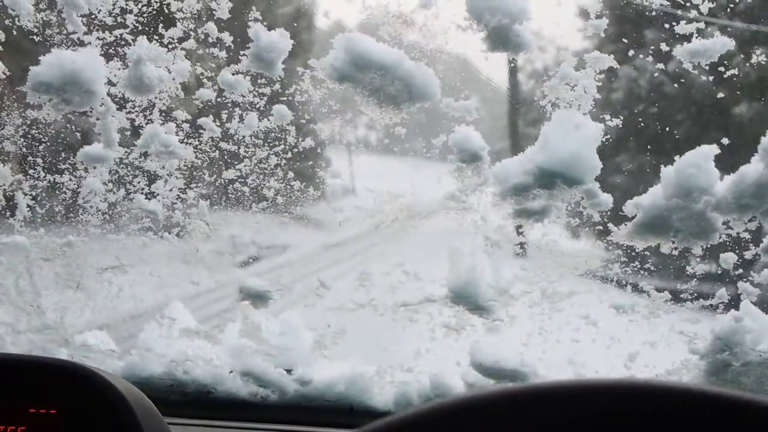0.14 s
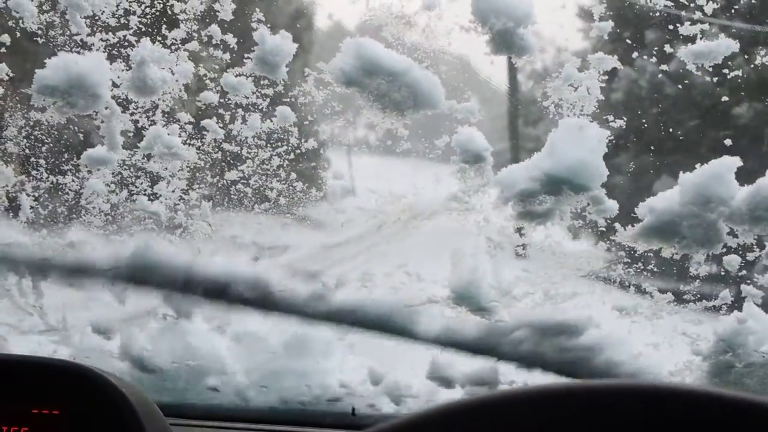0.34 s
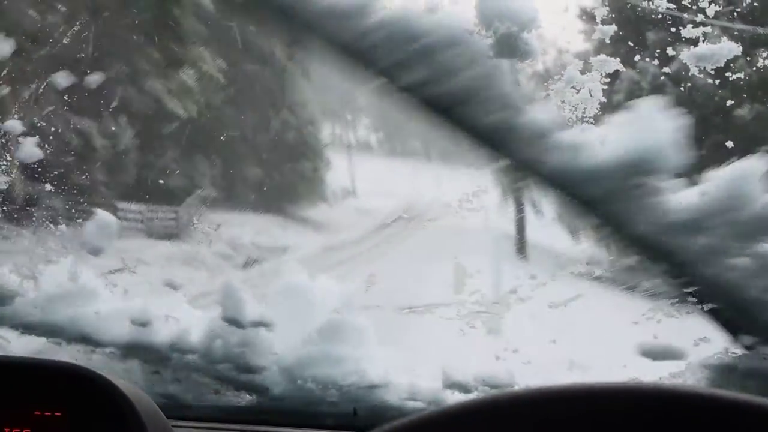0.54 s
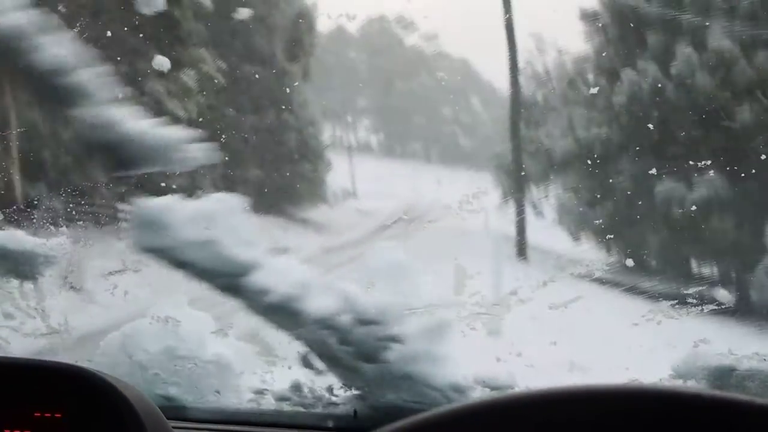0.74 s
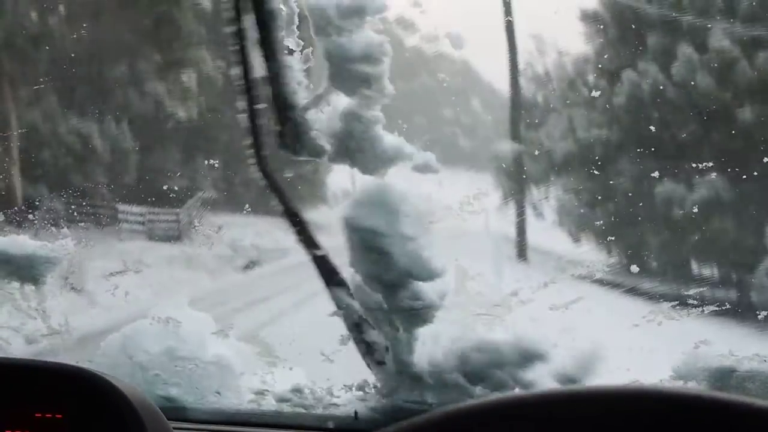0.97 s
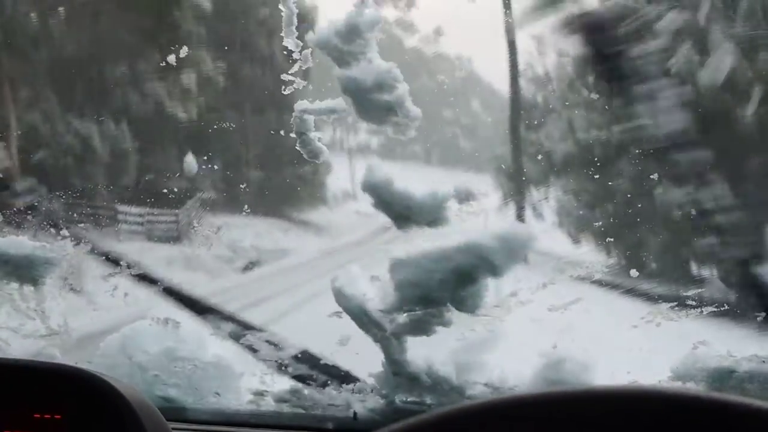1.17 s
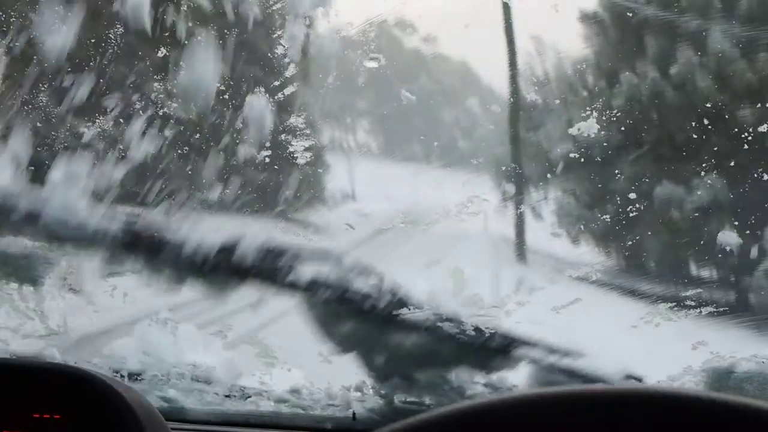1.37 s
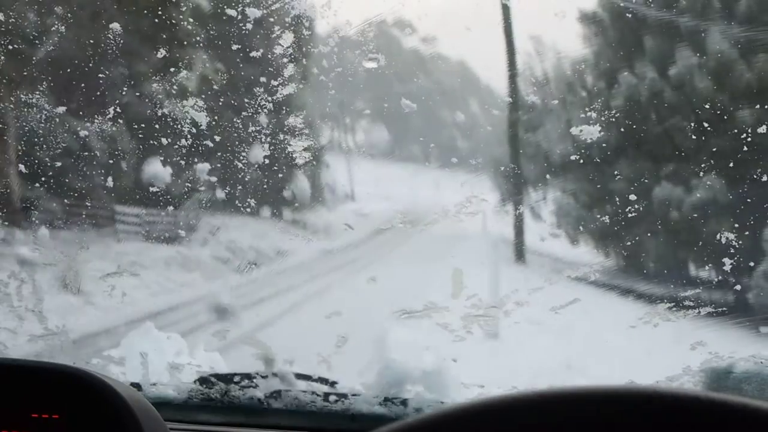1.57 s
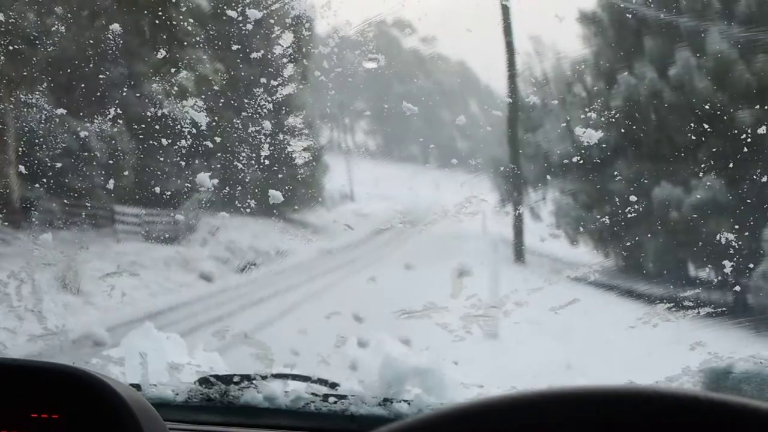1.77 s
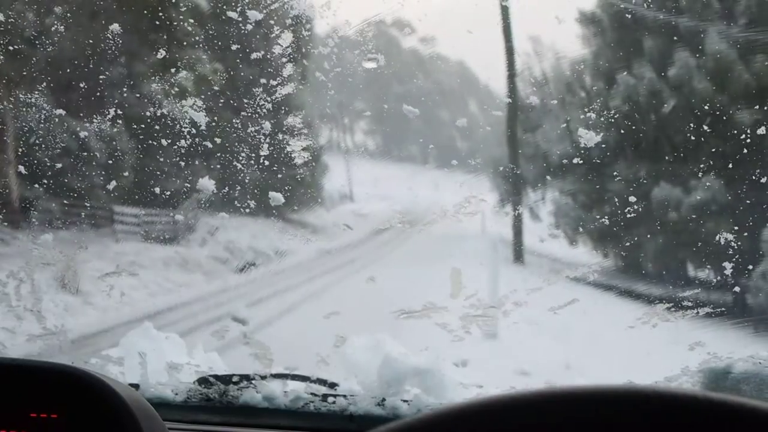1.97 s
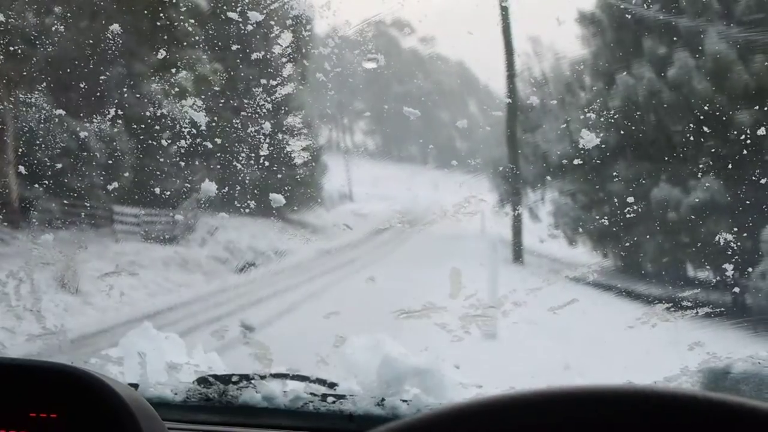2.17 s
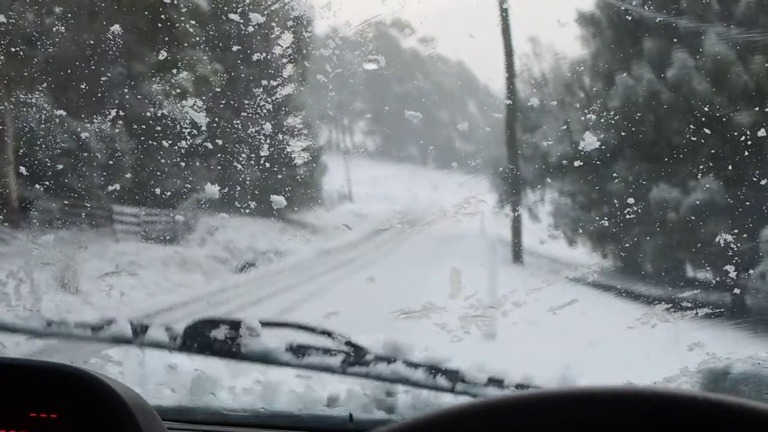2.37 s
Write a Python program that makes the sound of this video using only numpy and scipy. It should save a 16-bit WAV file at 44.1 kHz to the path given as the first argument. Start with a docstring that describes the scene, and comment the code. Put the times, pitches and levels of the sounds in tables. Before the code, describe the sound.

Wipers clear snow, heard close in stereo inside a parked car with a steady, ticking, chirping idle and faint hiss. A relay clicks at 0 s; the motor groans and whirrs, linkage knocks around 0.3 s, and blades crunch through snow, easing by 0.6 s. Low thuds at 1.0 and 1.36 s, scraping back until 1.6 s. Idle alone, then a softer click at 2.14 s and another crunchy sweep from 2.3 s.

```python
"""Inside a parked car, facing the snowed-up windscreen, in stereo: the engine idles throughout over a faint hiss.
A relay clicks (ringing modes and a snap of noise), the motor groans and whirrs as it takes up the load,
and the linkage knocks (low booms and short rings). The loaded arms judder and the blades plough up through
the snow (crackling grains over rubber hiss), thud over at the top and scrape back down.
After a pause the relay clicks again, more softly, and the next sweep begins."""
import sys
import numpy as np
from scipy import signal
from scipy.fft import rfft, irfft, next_fast_len
from scipy.io import wavfile
from scipy.ndimage import uniform_filter1d

SR = 44100
rng = np.random.default_rng(int(sys.argv[2]) if len(sys.argv) > 2 else 0)


def transcribe(signal):
    """Save signal, clipped to [-1, 1], as a 16-bit WAV file at the path in sys.argv[1]."""
    frames = np.atleast_2d(signal).T
    limited = np.clip(frames, -1, 1)
    pcm = np.round(limited * 32767).astype(np.int16)
    wavfile.write(sys.argv[1], SR, pcm)


N = 106457
T = np.arange(N) / SR


def amp(db):
    """Decibels to gain."""
    return 10 ** (np.asarray(db) / 20)


def unit(x):
    """Scales to rms 1."""
    return x / np.sqrt(np.mean(x ** 2) + 1e-20)


def curve(points):
    """Joins (time, level) points by straight lines, one value a sample."""
    return np.interp(T, *np.transpose(points))


def at_hz(points, hz):
    """Reads a spectrum on a log-frequency axis."""
    f, value = np.transpose(points)
    return np.interp(np.log(hz + 1), np.log(f + 1), value)


def wander(rate_hz):
    """Random drift of rms 1: noise whose content falls away above rate_hz."""
    hz = np.fft.rfftfreq(2 * N, 1 / SR)
    spectrum = rfft(rng.standard_normal(2 * N)) / (1 + (hz / rate_hz) ** 4)
    return unit(irfft(spectrum)[:N])


def hiss():
    """Two unrelated white noises."""
    return rng.standard_normal((2, N))


def since(start_s):
    """Seconds since a moment, zero before it."""
    return np.maximum(T - start_s, 0)


def cabin(drive, spectrum, same, side):
    """Colours two unrelated drives and mixes them to left and right, leaning by the balance at each pitch; rms 1."""
    size = next_fast_len(N + 4096)
    hz = np.fft.rfftfreq(size, 1 / SR)
    a, b = rfft(drive, size) * amp(at_hz(spectrum, hz))
    likeness = np.clip(at_hz(same, hz), -1, 1)
    lean = amp(at_hz(side, hz) / 2)
    mid, wide = a * np.sqrt(1 + likeness), b * np.sqrt(1 - likeness)
    left, right = (mid + wide) * lean, (mid - wide) / lean
    return unit(irfft(np.array([left, right]), size)[:, :N])


# how alike left and right hear the engine and the air: freq_hz, likeness (0-1)
ENGINE_SAME = [(100, .985), (300, .95), (700, .8), (1200, .5), (2100, .25), (4000, .1), (9000, .05)]
# their balance: freq_hz, left_over_right_db
ENGINE_SIDE = [(60, 2), (150, 3), (380, 3.5), (950, 3.0), (2380, -1.0), (5980, 1.5), (15000, -2)]


def from_engine(drive, spectrum):
    """Places a sound in stereo with the spread and balance of the engine."""
    return cabin(drive, spectrum, ENGINE_SAME, ENGINE_SIDE)


# how alike left and right hear the wipers: freq_hz, likeness (0-1)
GLASS_SAME = [(100, .988), (300, .95), (600, .86), (1200, .6), (2500, .2), (5000, .22), (9000, .03)]
# their balance: freq_hz, left_over_right_db
GLASS_SIDE = [(60, -0.27), (150, 0.46), (380, 1.6), (950, 1.7), (2380, -1.8), (5500, 1.3), (9000, -1.1),
              (14000, -0.16)]


def from_glass(drive, spectrum):
    """Places a sound in stereo with the spread and balance of the windscreen."""
    return cabin(drive, spectrum, GLASS_SAME, GLASS_SIDE)


def ring(modes, start_s, pitch, rise_s):
    """Damped modes struck at a given moment, with a short rise."""
    t = since(start_s)
    tones = sum(amp(db - 60 * t / t60) * np.sin(2 * np.pi * hz * pitch * t) for hz, db, t60 in modes)
    return (1 - np.exp(-t / rise_s)) * tones


def per_turn(turns, width, offbeat_db):
    """A smooth swell once a turn, and a weaker one half a turn later."""
    beat = np.exp(-.5 * (((turns + .5) % 1 - .5) / width) ** 2)
    offbeat = np.exp(-.5 * ((turns % 1 - .5) / width) ** 2)
    return beat + amp(offbeat_db) * offbeat


TURN_HZ, TICK_S = 15.0, 0.01573  # turns a second, moment of the first full tick
JUMP_FROM_S, JUMP_TO_S, JUMP_TURNS = 1.37, 1.53, .385  # the ticking jumps ahead by part of a turn


def idle_turns():
    """Place in the idle's cycle, in turns: a steady rate, with one jump ahead as at a splice."""
    jump = np.clip((T - JUMP_FROM_S) / (JUMP_TO_S - JUMP_FROM_S), 0, 1)
    return TURN_HZ * (T - TICK_S) + JUMP_TURNS * jump


# hum in the cabin: multiple_of_firing_rate, level_db
HUM = [(1, -52), (2, -58.5), (3, -49), (4, -48), (5, -46), (9, -63), (10, -55), (12, -50.5), (13, -61.5),
       (14, -58.5), (16, -55)]


def engine_hum(turns):
    """Firing orders sound as tones; two firings a turn, slightly uneven in time and level."""
    firings = 2 * turns + 0.011 * wander(rate_hz=3.5)
    return sum(amp(db + .5 * wander(rate_hz=6)) * np.sin(2 * np.pi * (k * firings + rng.random()))
               for k, db in HUM)


# colour of the firing puffs: freq_hz, relative_db
FIRING = [(20, -10), (45, -2), (100, -3), (160, -7.5), (215, -14.5), (290, -5.5), (380, -0.5), (480, -4),
          (600, -6), (700, -7.5), (860, 0), (1050, -8), (1280, -17.5), (1650, -7.5), (2050, -8),
          (2500, -21.5), (3600, -23), (5500, -34.5), (15000, -69)]
FIRING_DB, FIRING_DEPTH_DB, FIRING_LEAD_TURNS = -44, 3, 0.037


def engine_puffs(turns):
    """Each firing swells a low noise."""
    puffs = amp(FIRING_DEPTH_DB * np.cos(2 * np.pi * 2 * (turns + FIRING_LEAD_TURNS)))
    return amp(FIRING_DB) * from_engine(hiss() * puffs, FIRING)


# colour of the ticking: freq_hz, relative_db
TICKING = [(600, -17), (1400, -6.5), (1900, -3), (2280, -9), (2500, -8), (2900, 2.5), (3250, 0.5),
           (3950, -1), (4500, -14), (7000, -28), (15000, -43)]
TICKING_DB, TICK_WIDTH_TURNS, OFFBEAT_DB = -55, .15, -10
TICK_BED_DB, TICK_FLUTTER_DB = -14, .8  # steady noise between the ticks, rms flutter of the level


def engine_ticking(turns):
    """A fluttering noise burst once a turn, weaker half a turn later, over a steady bed."""
    ticks = per_turn(turns, TICK_WIDTH_TURNS, OFFBEAT_DB) + amp(TICK_BED_DB)
    ticks = ticks * amp(TICK_FLUTTER_DB * wander(rate_hz=290))
    return amp(TICKING_DB) * from_engine(hiss() * ticks, TICKING)


# colour of the bright chirp: freq_hz, relative_db
CHIRP = [(1000, -45), (1650, -20), (1780, -5.5), (2020, -1.5), (2250, -0.5), (2400, -29), (2700, -40),
         (8000, -70)]
CHIRP_DB, CHIRP_WIDTH_TURNS, CHIRP_LAG_TURNS, CHIRP_OFFBEAT_DB = -47, .13, .01, -10.5


def engine_chirp(turns):
    """A narrow band of noise, evened out and gated once a turn, weaker half a turn later."""
    band = from_engine(hiss(), CHIRP)
    power = uniform_filter1d((band ** 2).mean(0), size=400)
    even = band / np.sqrt(power + 1e-9)  # makes the main chirps about equally strong
    gate = per_turn(turns - CHIRP_LAG_TURNS, CHIRP_WIDTH_TURNS, CHIRP_OFFBEAT_DB)
    return amp(CHIRP_DB) * unit(even * gate)


def engine():
    """The idle: hum, puffs, ticks and chirps all follow the same turning."""
    turns = idle_turns()
    return engine_hum(turns) + engine_puffs(turns) + engine_ticking(turns) + engine_chirp(turns)


# colour of the faint steady hiss: freq_hz, relative_db
AIR = [(15, 5), (40, -1), (200, -19), (1000, 15), (3000, 5), (5500, -1.5), (8500, -0.5), (11000, -5),
       (15500, -6)]
AIR_DB = -56


def air():
    """Faint steady noise beneath everything."""
    return amp(AIR_DB) * from_engine(hiss(), AIR)


# relay clicks: start_s, level_db
CLICKS = [(0.009, -25.5), (2.137, -33.5)]
# what the relay rings with: freq_hz, level_db, t60_s
RELAY = [(818, -1.5, 0.038), (976, -1.5, 0.043), (1125, 1.5, 0.037), (1370, -13, 0.031), (2085, -8, 0.042),
         (2880, -14, .03), (3630, -15, 0.025), (4420, -13.5, 0.022), (5350, -23, 0.032)]
# colour of the contact snap: freq_hz, relative_db
SNAP = [(300, -49), (900, 14.5), (2200, -4), (5500, -6), (9000, -20.5), (15000, -46)]
SNAP_DB, SNAP_T60_S, RELAY_RISE_S = -8, .045, .0007


def relay():
    """The contact snaps, a decaying noise, and its case rings in damped modes."""
    noise = amp(SNAP_DB) * from_glass(hiss(), SNAP)
    clicks = 0
    for start_s, level_db in CLICKS:
        snap = noise * (T > start_s) * amp(-60 * since(start_s) / SNAP_T60_S)
        clicks = clicks + amp(level_db) * (ring(RELAY, start_s, 1, RELAY_RISE_S) + snap)
    return clicks


# the motor groans as it takes up load: start_s, length_s, level_db
GROANS = [(0.098, 0.21, -42), (1.258, 0.082, -40), (2.178, 0.22, -40)]
# partials of the groan: multiple, level_db
GROAN_PARTIALS = [(1, -1), (2, -26), (3, -9.5)]
GROAN_HZ, GROAN_WAVER = 213.6, .05  # mean pitch, rms waver as a share of it


def groan():
    """The note of the motor under load wavers in pitch, and each partial in level."""
    turns = np.cumsum(GROAN_HZ * (1 + GROAN_WAVER * wander(rate_hz=23.7))) / SR
    swell = sum(amp(db) * np.sin(np.pi * np.clip((T - s) / length, 0, 1)) for s, length, db in GROANS)
    note = sum(amp(db + 3.7 * wander(rate_hz=22)) * np.sin(2 * np.pi * k * turns)
               for k, db in GROAN_PARTIALS)
    return swell * note


# wiper motor runs: start_s, end_s, level_db
RUNS = [(0.12, 1.62, -44), (2.177, 2.5, -45.5)]
# colour of the whirr: freq_hz, relative_db
MOTOR = [(60, -33), (150, 7.5), (210, -2.5), (280, 4.5), (380, -1), (480, -9), (650, -3.5), (820, -2),
         (1050, -17.5), (1400, -16.5), (4000, -40)]
MOTOR_RAMP_S = 0.011


def motor():
    """The geared motor whirrs: noise with a rough, fast-varying level, ramped on and off."""
    running = sum(amp(db) * np.clip(np.minimum(T - start, end - T) / MOTOR_RAMP_S, 0, 1)
                  for start, end, db in RUNS)
    roughness = amp(2.7 * wander(rate_hz=130))
    return running * from_glass(hiss() * roughness, MOTOR)


# low modes of a thud, before its pitch factor and glide: freq_hz, level_db, t60_s
BOOM = [(76.3, 1.5, 0.18), (128.5, -2.5, 0.084)]
BOOM_RISE_S = 0.007
BOOM_GLIDE, BOOM_GLIDE_S = 0.91, 0.0129  # the boom starts sharp by this share and settles


def boom(start_s, pitch):
    """A soft low thud whose pitch falls as it settles."""
    t = since(start_s)
    swept = pitch * (t + BOOM_GLIDE * BOOM_GLIDE_S * (1 - np.exp(-t / BOOM_GLIDE_S)))
    tones = sum(amp(db - 60 * t / t60) * np.sin(2 * np.pi * hz * swept) for hz, db, t60 in BOOM)
    return (1 - np.exp(-(t / BOOM_RISE_S) ** 2)) * tones


# the linkage and blades knock over: start_s, level_db, boom_pitch_factor, knock_over_boom_db
THUDS = [(0.138, -33, 1.25, 2.5), (0.28, -26.5, 1.25, 6.5), (0.334, -33, 1.5, 14), (0.994, -22, 0.95, -2),
         (1.024, -27.5, 0.97, -20), (1.06, -29.5, .88, -8), (1.364, -23, 0.954, -4), (2.292, -40, 2.6, 16),
         (2.355, -27.5, 1.1, 3)]
# brighter modes of the knock, before the common pitch factor: freq_hz, level_db, t60_s
KNOCK = [(237, -3, .05), (287, -6, 0.053), (382, -8, 0.12), (583, -7, 0.064), (704, 3, 0.029),
         (1580, 10, 0.005)]
KNOCK_PITCH, KNOCK_RISE_S = 0.95, 0.0024


def thuds():
    """Each knock of the linkage sets the windscreen and cabin booming."""
    total = 0
    for start_s, level_db, pitch, knock_db in THUDS:
        knock = amp(knock_db) * ring(KNOCK, start_s, KNOCK_PITCH, KNOCK_RISE_S)
        total = total + amp(level_db) * (boom(start_s, pitch) + knock)
    return total


# weight of the snow on the arms, before ARMS_DB: time_s, level_db
LOAD = [(0.19, -49.5), (0.245, -34.5), (0.285, -30.5), (0.34, -34.5), (0.375, -41), (0.44, -35),
        (0.48, -44), (0.53, -66), (1.23, -62), (1.29, -49), (1.35, -50), (1.45, -44), (1.61, -42),
        (1.7, -56), (2.17, -53), (2.215, -40.5), (2.28, -47), (2.32, -35.5), (2.362, -29), (2.41, -33)]
# colour of the judder: freq_hz, relative_db
ARMS = [(30, -26), (60, -18), (85, -5.5), (115, 3), (160, -4), (230, -4.5), (330, -6), (420, -7.5),
        (560, -15.5), (750, -9), (1100, -24), (2500, -54)]
ARMS_DB = 4


def arms():
    """The loaded arms judder against the glass: low noise that follows the load."""
    return from_glass(hiss(), ARMS) * amp(ARMS_DB + curve(LOAD))


GRAINS_PER_S, GRAIN_SPREAD_DB, GRAIN_SHARE = 4000, 2.8, .4  # share of the power in single grains
CRUNCH_DB = 1.17  # rms waver of the level


def crush():
    """Snow crystals break in countless small snaps, over a smoother noise."""
    strength = amp(GRAIN_SPREAD_DB * np.minimum(rng.exponential(1, N), 4))
    snaps = hiss() * strength * (rng.random(N) < GRAINS_PER_S / SR)
    mix = np.sqrt(GRAIN_SHARE) * unit(snaps) + np.sqrt(1 - GRAIN_SHARE) * hiss()
    return mix * amp(CRUNCH_DB * wander(rate_hz=80))


# resonances of the windscreen and cabin: freq_hz, width_hz, gain_db
PANE = [(710, 52, -7.5), (740, 46, 6), (1025, 19, -0.5), (2310, 27, 1), (2560, 87, -5), (2696, 120, 4.5),
        (3000, 50, -4), (3150, 87, 1), (3420, 61, 2.5), (3650, 60, -4), (3910, 50, 1.5), (4660, 110, -2.5),
        (4725, 88, 3.5)]
REFLECT_DB = -3


def windscreen(x, count=24):
    """Sound from outside passes the pane's resonances; the cabin adds close reflections to its treble."""
    size = next_fast_len(N + 4096)
    hz = np.fft.rfftfreq(size, 1 / SR)
    colour = amp(sum(db / (1 + (2 * (hz - f) / width) ** 2) for f, width, db in PANE))
    taps = np.zeros((2, size))
    for side in taps:
        delay_s = .001 * (1 + rng.random(count) * np.arange(1, count + 1))  # 1 to 25 ms
        side[(delay_s * SR).astype(int)] = rng.choice([-1., 1.], count)
    echo = amp(REFLECT_DB) * hz ** 2 / (hz ** 2 + 2500 ** 2)
    room = (1 + echo * rfft(taps) / np.sqrt(count)) / np.sqrt(1 + echo ** 2)  # keeps the power about even
    return irfft(rfft(x, size) * colour * room, size)[:, :N]


# drag of the blades on snow and glass, before the offsets below: time_s, level_db
DRAG = [(0.195, -69), (0.225, -46), (0.256, -29.5), (0.3, -32), (0.355, -34.5), (0.384, -38), (0.406, -33),
        (0.446, -35), (0.482, -42), (0.518, -38.5), (0.58, -45.5), (0.626, -44.5), (0.652, -54),
        (0.7, -46.5), (0.762, -52), (0.796, -41.5), (0.86, -46), (0.91, -42.5), (0.97, -54), (1.0, -50),
        (1.12, -55), (1.17, -53.5), (1.24, -53), (1.31, -44), (1.414, -43), (1.438, -34), (1.465, -39),
        (1.53, -32), (1.59, -34.5), (1.603, -49), (1.622, -67), (2.275, -79), (2.302, -47.5),
        (2.326, -32.5), (2.352, -29.5), (2.41, -34)]
# colour of the crushed snow: freq_hz, relative_db
SNOW = [(120, -21), (250, -26.5), (400, -8), (540, 0.5), (700, -14), (830, -3.5), (1030, 0.5),
        (1300, -12.5), (1600, -5), (1900, 0), (2300, 1), (2750, 0), (3100, -2.5), (3600, -3), (4800, -8.5),
        (6300, -16.5), (7200, -16), (8400, -14), (10500, -23.5), (15500, -38)]
# colour of the rubber on wet glass: freq_hz, relative_db
RUBBER = [(300, -30), (800, 4), (1300, -4), (2200, -12), (3800, 0), (5000, -3), (6300, -10), (7500, -5),
          (8800, -3.5), (10500, -13), (15500, -28)]
# loose snow spatters on the glass: start_s, level_db, length_s
SPATTERS = [(0.78, -57, 0.021), (0.898, -50, .02), (0.988, -49, .02), (1.163, -43, 0.014),
            (1.203, -46.5, 0.026), (1.425, -38, 0.029)]
# colour of the spatters: freq_hz, relative_db
SPATTER = [(1000, -23), (3000, -5), (4300, -1), (4900, 3), (6200, -8), (8500, 2.5), (10500, -10),
           (15500, -25)]
SNOW_DB, RUBBER_DB = 5, -45.5
RUBBER_FOLLOW, RUBBER_KNEE_DB = 0.56, -45.5  # above the knee the rubber grows slower than the drag


def blades():
    """The blades crush snow and fling some of it; beneath that, rubber hisses on wet glass."""
    drag = curve(DRAG)
    snow = from_glass(crush(), SNOW) * amp(SNOW_DB + drag)
    over = drag - RUBBER_KNEE_DB
    rubber = from_glass(hiss(), RUBBER) * amp(RUBBER_DB + np.minimum(over, RUBBER_FOLLOW * over))
    flung = 0
    for start_s, level_db, length_s in SPATTERS:
        age = since(start_s) / length_s
        flung = flung + amp(level_db) * np.minimum(6 * age, 1) * np.exp(-age ** 2)
    return windscreen(snow + rubber + flung * from_glass(crush(), SPATTER))


def scene():
    """Wipers over the idle and a faint steady hiss."""
    return engine() + air() + relay() + groan() + motor() + thuds() + arms() + blades()


EDGE_HZ = 15740


def record(dry):
    """The recorder's band limit: a steep low-pass."""
    lowpass = signal.firwin(1023, EDGE_HZ, window=("kaiser", 9), fs=SR)
    return signal.oaconvolve(dry, lowpass[None], "same")


dry = scene()
out = record(dry)
transcribe(out)
```